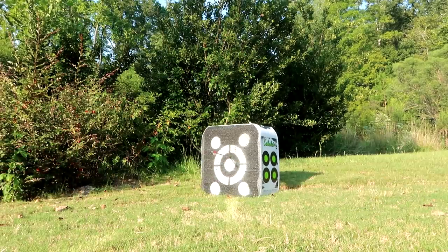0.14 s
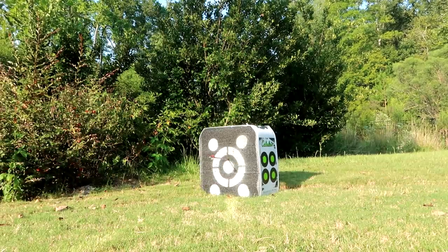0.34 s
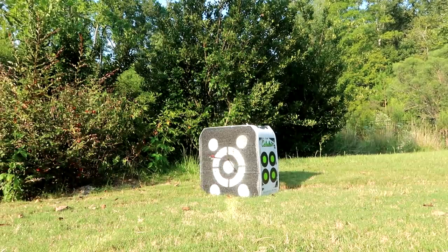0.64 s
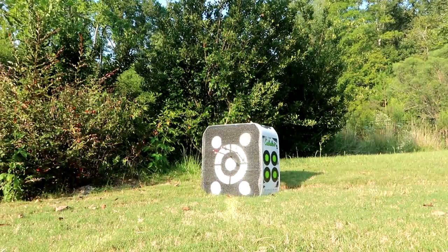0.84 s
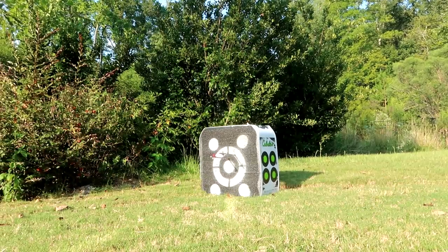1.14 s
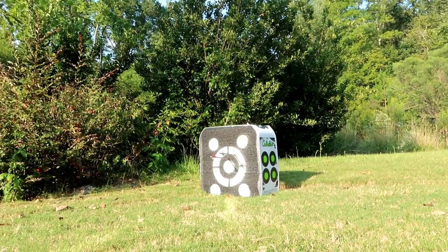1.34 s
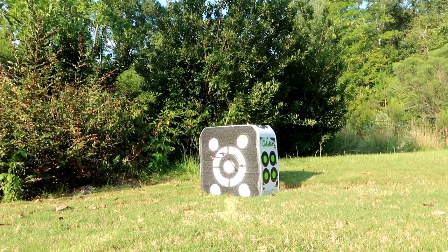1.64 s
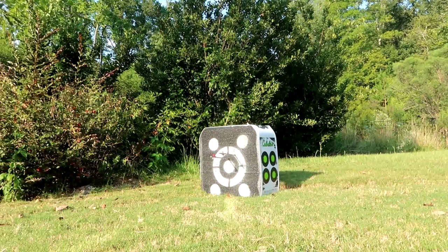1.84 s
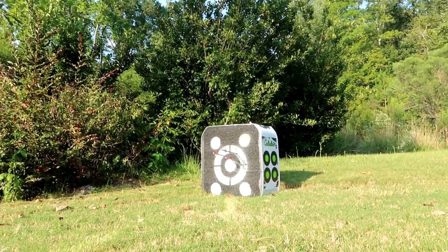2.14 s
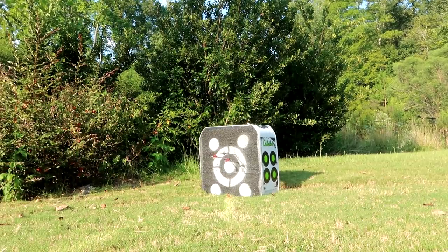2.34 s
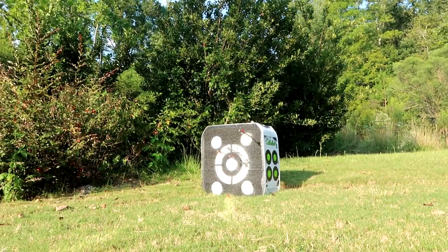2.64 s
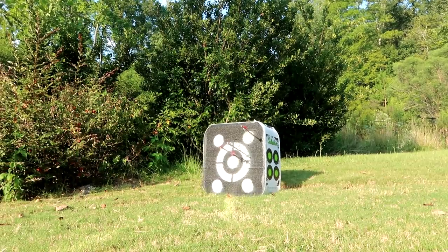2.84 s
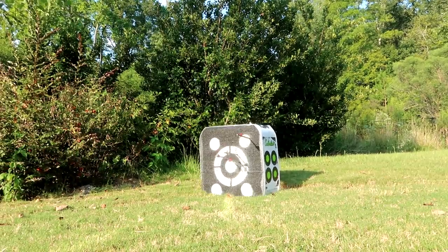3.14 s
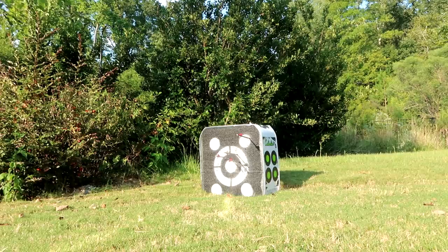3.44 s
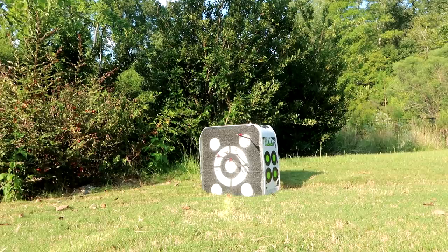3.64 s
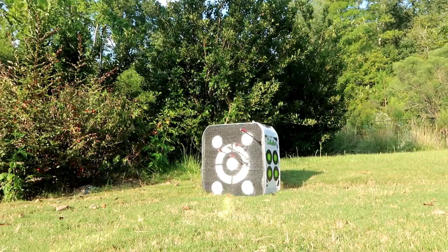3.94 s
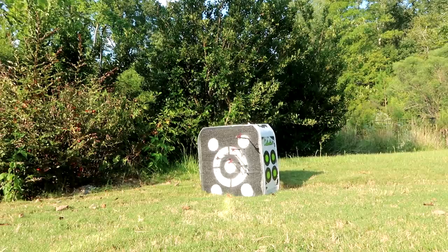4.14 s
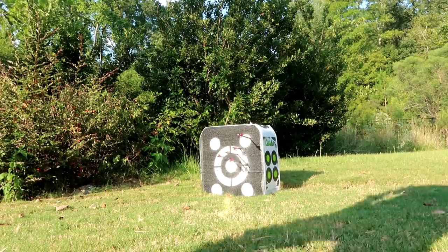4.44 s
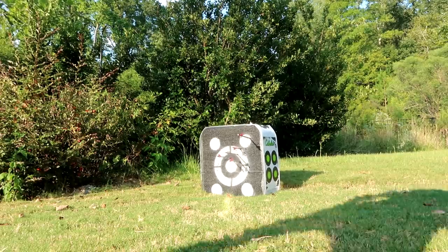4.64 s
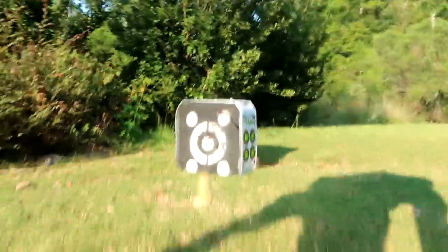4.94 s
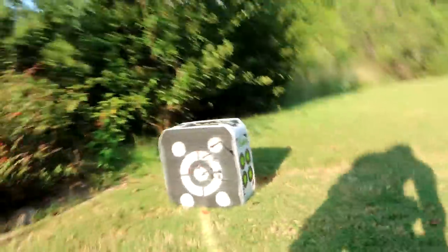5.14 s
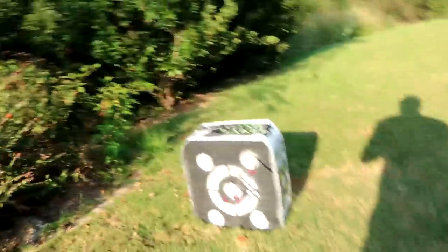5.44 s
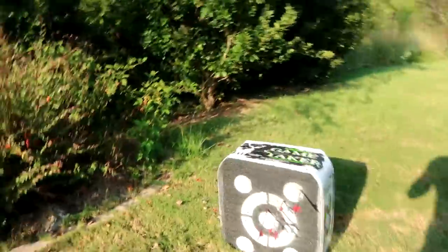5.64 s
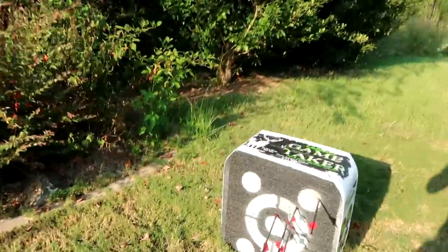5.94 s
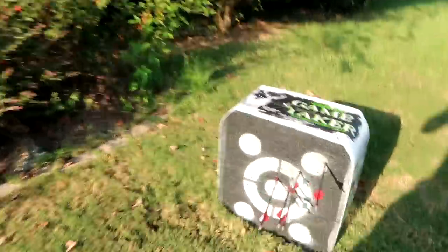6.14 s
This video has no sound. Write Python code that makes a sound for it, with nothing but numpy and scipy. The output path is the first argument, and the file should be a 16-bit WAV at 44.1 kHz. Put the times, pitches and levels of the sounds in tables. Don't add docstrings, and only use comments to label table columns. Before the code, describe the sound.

Five arrows in quick succession crack and thud into a foam block on a lawn, then a hand grabs the camera with knocks, rustle and footsteps.

```python
import sys
import numpy as np
from scipy import signal
from scipy.fft import rfft, irfft, next_fast_len
from scipy.io import wavfile
from scipy.ndimage import uniform_filter1d

SR = 44100
rng = np.random.default_rng(int(sys.argv[2]) if len(sys.argv) > 2 else 0)


def generate_wav(signal):
    frames = np.transpose(np.atleast_2d(signal))
    scaled = np.clip(frames, -1, 1) * 32767
    pcm = np.round(scaled).astype(np.int16)
    wavfile.write(sys.argv[1], SR, pcm)


def rack_gain(trim_db):
    fader = np.asarray(trim_db, float)
    return 10 ** (fader / 20)


N = 276948
T = np.arange(SR // 4) / SR

# (start [s], traffic [dB], leaves [dB], gain recovery [dB/s])
CUTS = [
    (-1, 0, 0, 1),
    (.221, 0, -1, 1),
    (1.056, 0, 0, 1),
    (2.221, -1, 0, 4),
    (3.156, 0, 1, 3),
    (4.324, -2, -2, 6),
]
# (frequency [Hz], density [dB/Hz])
TRAFFIC_SPECTRUM = [(15, -45), (28, -8), (45, -1), (82, -1), (130, -1), (249, -5), (677, -24), (1130, -20),
                    (2500, -30), (6210, -47), (8140, -42), (9570, -52), (11000, -57), (16000, -66)]
# (frequency [Hz], density [dB/Hz])
CRICKET_SPECTRUM = [(25, -54), (59, -35), (249, 1), (863, -7), (1130, -2), (2500, -10), (5140, -18),
                    (7300, -18), (7800, -7), (8500, -7), (9000, -15), (13600, -23), (16000, -30)]
# (start [s], end [s], frequency [Hz], level [dB])
ENGINES = [(.221, 1.056, 59, -38), (2.221, 3.156, 750, -56.5), (2.221, 2.7, 82, -43),
           (3.156, 3.76, 425, -46), (3.156, 3.76, 515, -49), (3.156, 6.28, 59, -42)]
# (time [s], frequency [Hz], glide [Hz/s], level [dB])
CHIRPS = [
    (1.145, 3650, 3000, -60),
    (1.38, 3680, -300, -59),
]
# (frequency [Hz], density [dB/Hz])
HISS_SPECTRUM = [(500, -30), (1200, -6), (2500, 0), (4000, -4), (6000, -12), (9000, -21), (15000, -30)]
# (frequency [Hz], density [dB/Hz])
SIDE_SPECTRUM = [(500, -26), (1200, -8), (3000, 0), (5000, -1), (9000, -9), (13000, -13), (16000, -22)]
# (frequency [Hz], density [dB/Hz])
CLOTH_SPECTRUM = [(60, 7), (200, -5), (400, 3), (700, 0), (1400, -7), (3000, -17), (5000, -21),
                  (9000, -32), (12000, -36), (15000, -46)]
# (time [s], level [dB])
RUSTLE = [(4.32, -80), (4.327, -43), (4.8, -44), (4.84, -33), (4.91, -42), (5.3, -40.5), (5.75, -38),
          (6.28, -38)]
# (time [s], swell [dB])
SWIPES = [(4.45, 4), (5.2, 3)]
# (time [s], level [dB])
SLIDE = [(4.55, -62), (4.63, -54), (4.8, -51), (4.86, -42), (4.9, -62)]
# (time [s], level [dB])
DRY_GRASS = [(5.85, -78), (6.0, -67), (6.28, -66)]
# (frequency [Hz], bandwidth [Hz], level [dB])
STRAP_BANDS = [(420, 300, 0), (2150, 900, -9), (3300, 700, -10), (4900, 900, -5)]
# (time [s], half length [s], level [dB], squeak [dB])
SLIPS = [
    (6.1, .011, -32, -4),
    (6.15, .04, -48, 3),
]
# (time [s], level [dB], frequency [Hz])
GRAB = [(4.821, -24, 1500), (4.827, -5, 1400), (4.833, -13, 110), (4.842, -21, 330), (4.852, -22, 800),
        (4.8552, 5, 420), (4.8577, 4, 700), (4.86, -11, 190)]
# (time [s], level [dB], frequency [Hz])
STEPS = [(5.065, -16, 200), (5.18, -19, 210), (5.488, -20, 300), (5.645, -26, 250), (5.787, -24, 540),
         (5.995, -22, 140), (6.081, -18, 500), (6.255, -22, 370)]
# (time [s], level [dB], frequency [Hz])
SNAPS = [(5.729, -22, 600), (5.7295, -18, 1900), (5.73, -20, 3300), (5.787, -27, 1500)]
# (time [s], level [dB], frequency [Hz])
TICKS = [(6.104, -21, 2150), (6.1045, -26, 3350)]
RELEASES = [.571, 1.8025, 2.467, 3.559]
# (frequency [Hz], level [dB], t60 [s])
BOW_MODES = [(600, -5, .03), (1240, -4, .04), (1760, -1, .04), (2580, -1, .03), (3130, 2, .02),
             (4950, -12, .02)]
# (time [s], crack [Hz], thud [dB], shaft [Hz], upper block mode [dB])
IMPACTS = [
    (.027, 2150, -2, 1900, -3),
    (.7677, 2300, -5, 1550, -12),
    (1.998, 3200, 0, 1900, -5),
    (2.664, 2750, -11, 1800, -11),
    (3.7566, 2900, 4, 2450, -3),
]
# (frequency [Hz], density [dB/Hz])
TEAR_SPECTRUM = [(100, -6), (220, -4), (700, -3), (1050, -9), (1900, 1), (3300, -3), (4500, -10),
                 (5500, -20), (9000, -32), (16000, -44)]
# (frequency [Hz], centre [dB/bin], difference [dB/bin])
FAINT = [(6000, -100, -120), (7000, -89, -115), (8500, -91, -110), (9300, -85, -105), (10000, -86, -102),
         (12000, -84, -99), (15000, -82, -92), (16000, -77, -78), (16700, -55, -50)]


def colour(x, table):
    hz, db = np.transpose(table)
    f = np.arange(len(x) // 2 + 1) * SR / len(x) + 1
    return irfft(rfft(x) * rack_gain(np.interp(np.log(f), np.log(hz), db)), len(x))


def noise(table, n=N):
    x = colour(rng.standard_normal(next_fast_len(n)), table)[:n]
    return x / np.std(x)


def band(hz, width_hz, n=N):
    edges_hz = [hz - width_hz / 2, hz + width_hz / 2]
    sos = signal.butter(2, edges_hz, "band", fs=SR, output="sos")
    x = signal.sosfilt(sos, rng.standard_normal(n))
    return x / np.std(x)


def walk(rate_hz):
    k = int(SR / rate_hz)
    held = np.repeat(rng.standard_normal(N // k + 1), k)
    x = uniform_filter1d(uniform_filter1d(held, k), k)[:N]
    return x / np.std(x)


def fade(t60, rise=.0002):
    return (1 - np.exp(-T / rise)) * np.exp(-T * np.log(1000) / t60)


def ring(hz, t60, rise=.0002):
    return np.sin(2 * np.pi * hz * T) * fade(t60, rise)


def bump(s, half_s):
    return np.exp(-((np.arange(N) / SR - s) / half_s) ** 2)


def curve(table):
    s, db = np.transpose(table)
    return rack_gain(np.interp(np.arange(N) / SR, s, db, left=-120, right=-120))


def add(out, s, mid, side=0):
    i = int(s * SR)
    a, b = max(i, 0), min(i + len(mid), N)
    out[:, a:b] += np.array([mid + side, mid - side])[:, a - i:b - i]


def scene_levels_db():
    starts, low_db, high_db, _ = np.transpose(CUTS)
    part = np.searchsorted(starts, np.arange(N) / SR) - 1
    return low_db[part], high_db[part]


def traffic(out):
    low_db, high_db = scene_levels_db()
    both = rack_gain(-33) * noise(TRAFFIC_SPECTRUM)
    low = signal.sosfiltfilt(signal.butter(2, 450, fs=SR, output="sos"), both)
    rumble = low * rack_gain(low_db + 1.5 * walk(9))
    leaves = (both - low) * rack_gain(high_db + .8 * walk(12))
    add(out, 0, rumble + leaves)


def engines(out):
    t = np.arange(N) / SR
    for start, end, hz, db in ENGINES:
        gain = (t > start) * (t < end) * rack_gain(db + 3 + 2.5 * walk(12))
        waver_s = np.cumsum(.004 * walk(8)) / SR
        add(out, 0, gain * np.sin(2 * np.pi * hz * (t + waver_s)))


def crickets(out):
    _, high_db = scene_levels_db()
    side = rack_gain(-50) * noise(CRICKET_SPECTRUM) * rack_gain(high_db)
    add(out, 0, np.zeros(N), side)


def bird(out):
    for s, hz, glide_hz, db in CHIRPS:
        t = np.arange(N) / SR - s
        add(out, 0, rack_gain(db) * bump(s, .022) * np.sin(2 * np.pi * (hz + glide_hz * t / 2) * t))


def cloth(out):
    swipes_db = sum(db * bump(s, .04) for s, db in SWIPES)
    grains = curve(RUSTLE) * rack_gain(1.3 * walk(120) + .8 * walk(12) + swipes_db)
    brush = rack_gain(np.where(np.arange(N) < 4.86 * SR, -8, -17))
    side = grains * (rack_gain(-9) * noise(CLOTH_SPECTRUM) + brush * noise(SIDE_SPECTRUM))
    add(out, 0, grains * noise(CLOTH_SPECTRUM), side)
    slide = curve(SLIDE)
    add(out, 0, slide * band(3600, 4000), rack_gain(-3) * slide * band(3600, 4000))
    add(out, 0, curve(DRY_GRASS) * rack_gain(3 * walk(25)) * band(11300, 1600))


def strap(out):
    for s, half_s, db, squeak_db in SLIPS:
        slip = rack_gain(db + 3 * walk(400)) * bump(s, half_s)
        bands = 0
        for hz, width_hz, band_db in STRAP_BANDS:
            bands = bands + rack_gain(band_db + squeak_db * (hz > 4000)) * band(hz, width_hz)
        add(out, 0, slip * bands, rack_gain(-12) * slip * noise(HISS_SPECTRUM))


def knock(out, rows, cycles, scratch_db, scratch_t60, overtone=0):
    for s, db, hz in rows:
        scratch = rack_gain(db + scratch_db) * fade(scratch_t60)
        body = ring(hz, cycles / hz, rise=.0005) + overtone * ring(2.4 * hz, .035, rise=.001)
        body = rack_gain(db) * body
        spread = rack_gain(-7 if hz < 350 else -17) * np.roll(body, 60)
        side = spread + rack_gain(-4) * scratch * noise(SIDE_SPECTRUM, len(T))
        add(out, s, body + scratch * noise(HISS_SPECTRUM, len(T)), side)


def handling(out):
    knock(out, GRAB, cycles=10, scratch_db=-18, scratch_t60=.03)
    knock(out, STEPS, cycles=11, scratch_db=-33, scratch_t60=.04, overtone=rack_gain(-9))
    knock(out, SNAPS, cycles=25, scratch_db=-11, scratch_t60=.02)
    knock(out, TICKS, cycles=60, scratch_db=-12, scratch_t60=.015)


def bow(out):
    limbs_db, buzz_db = -13, -39
    for s in RELEASES:
        limbs = 0
        for hz, db, t60 in BOW_MODES:
            limbs = limbs + rack_gain(db) * ring(hz * (1 + .01 * rng.standard_normal()), t60)
        slap = rack_gain(-7 + 3 * walk(500)[:len(T)]) * band(2700, 2000, len(T)) * fade(.035)
        buzz = rack_gain(buzz_db) * fade(.3, rise=.015)
        mid = rack_gain(limbs_db - 10) * (limbs + slap) + buzz * noise(HISS_SPECTRUM, len(T))
        side = rack_gain(-4) * buzz + rack_gain(limbs_db - 24) * fade(.04)
        add(out, s, mid, side * noise(SIDE_SPECTRUM, len(T)))


def flight(out):
    vanes_db, whistle_db = -26, -42
    ahead = T[-1] - T
    near = 1 / (1 + ((ahead - .02) / .012) ** 2) ** 1.3 + .25 * np.exp(-ahead / .02)
    hiss = rack_gain(vanes_db) * near
    whistle = rack_gain(whistle_db) * np.exp(-((ahead - .06) / .03) ** 2)
    glide = T - .35 * (ahead - .06) ** 2
    tones = np.sin(2 * np.pi * 920 * glide) + .7 * np.sin(2 * np.pi * 548 * glide)
    for s, *_ in IMPACTS:
        mid = hiss * noise(HISS_SPECTRUM, len(T)) + whistle * tones
        add(out, s - T[-1], mid, rack_gain(-5) * hiss * noise(SIDE_SPECTRUM, len(T)))


def echo(out, s, thud_db):
    bands = 1.0 * band(1700, 1300, len(T)) + .6 * band(520, 250, len(T))
    sound = bands * fade(.05, rise=.004) + 1.5 * ring(1550, .025, rise=.003)
    add(out, s + .039, rack_gain(-20 - .4 * thud_db) * sound)


def target(out):
    crack_level_db, tear_db, shaft_db = 7, -9, -4
    braking = 1 / (1 + (T / .0062) ** 12)
    for arrows, (s, crack_hz, thud_db, shaft_hz, upper_db) in enumerate(IMPACTS):
        thud_hz = 485 - 2.5 * thud_db
        snap = rack_gain(-8) * noise(SIDE_SPECTRUM, len(T)) * fade(.005)
        crack = rack_gain(crack_level_db) * (ring(crack_hz, .009, rise=.0001) + snap)
        ragged = rack_gain(4 * walk(250)[:len(T)])
        tear = rack_gain(tear_db) * noise(TEAR_SPECTRUM, len(T)) * (braking + rack_gain(-12) * ragged * fade(.14))
        thud = rack_gain(thud_db) * ring(thud_hz, .06, rise=.0005) * (.25 + braking)
        thud = thud + rack_gain(-17) * ring(170, .12, rise=.003)
        upper = rack_gain(upper_db) * ring(680, .04, rise=.0005) * (.2 + braking)
        shaft = rack_gain(shaft_db) * ring(shaft_hz, .04, rise=.001) * (.1 + braking)
        scatter = rack_gain(tear_db - 17) * fade(.13)
        late = rack_gain(-4) * fade(.1) * noise(SIDE_SPECTRUM, len(T))
        returned = scatter * (noise(HISS_SPECTRUM, len(T)) + late)
        side = noise(SIDE_SPECTRUM, len(T)) * (rack_gain(tear_db - 8) * fade(.018) + scatter)
        side = side + rack_gain(-15) * np.roll(thud, 30)
        add(out, s, crack + tear + thud + upper + shaft + returned, side)
        bounce = rack_gain(crack_level_db - 11) * ring(.9 * crack_hz, .009, rise=.0004)
        add(out, s + .0045, bounce)
        rock_db, rock_s = -3 - 2.4 * arrows, .014 + .0013 * arrows
        add(out, s + rock_s, rack_gain(rock_db) * ring(.8 * thud_hz, .035, rise=.002))
        echo(out, s, thud_db)


def scene():
    out = np.zeros((2, N))
    for source in (traffic, engines, crickets, bird, cloth, strap, handling, bow, flight, target):
        source(out)
    return out


def drop_faint(x, gain_db, column):
    f, s, z = signal.stft(x, SR, nperseg=1024)
    patch = np.abs(z[:512].reshape(64, 8, -1)).mean(axis=1)
    table = np.transpose(FAINT)
    limit_db = np.interp(f[4:512:8], table[0], table[column], left=-200)[:, None]
    limit_db = limit_db + np.interp(s * SR, np.arange(N), gain_db)
    limit_db = limit_db + 1.5 * rng.standard_normal(limit_db.shape)
    z[:512] *= np.repeat(patch > rack_gain(limit_db), 8, axis=0)
    return signal.istft(z, SR, nperseg=1024)[1][:N]


def recorder_gain_db():
    duck_db, duck_s = -8.5, .03
    t, db = np.arange(N) / SR, np.zeros(N)
    ends = [cut[0] for cut in CUTS[1:]] + [N / SR]
    blows = [hit[0] for hit in IMPACTS] + [4.857]
    for blow, end, (start, *_, climb) in zip(blows, ends, CUTS):
        since = np.clip(t - blow, 0, None) * (t < end)
        db += np.minimum(duck_db + climb * since, 2) * (1 - np.exp(-since / duck_s))
        db -= 12 * np.exp(-((t - start + .005) / .003) ** 2)
    return db


def band_limit(x):
    return signal.sosfilt(signal.butter(12, 16670, fs=SR, output="sos"), x)


def record(dry):
    db = recorder_gain_db()
    left, right = np.clip(dry * rack_gain(db), -.98, .98)
    mid = drop_faint((left + right) / 2, db, column=1)
    side = drop_faint((left - right) / 2, db, column=2)
    return band_limit(np.array([mid + side, mid - side]))


dry = scene()
out = record(dry)
generate_wav(out)
```